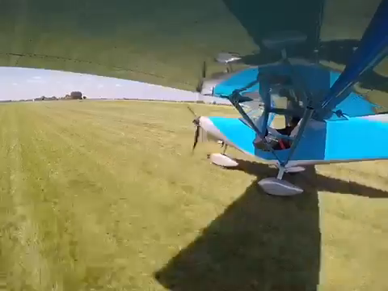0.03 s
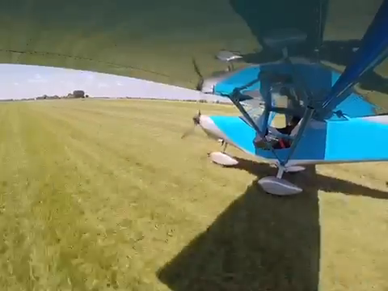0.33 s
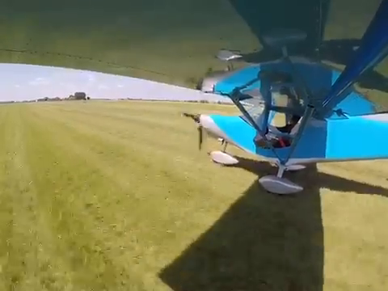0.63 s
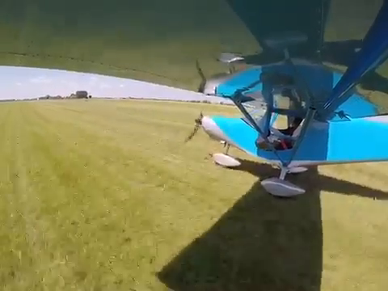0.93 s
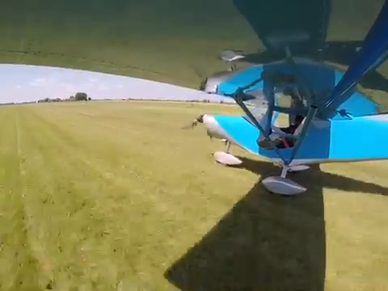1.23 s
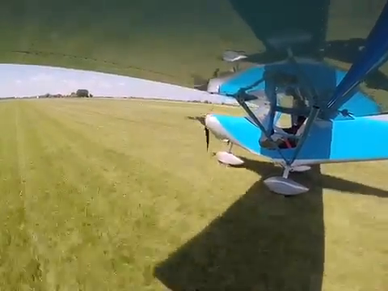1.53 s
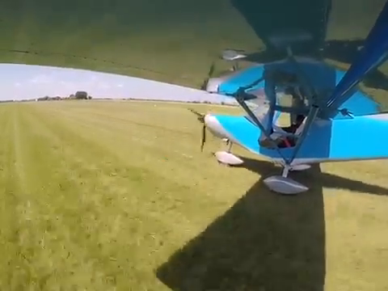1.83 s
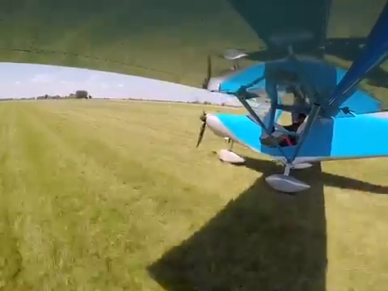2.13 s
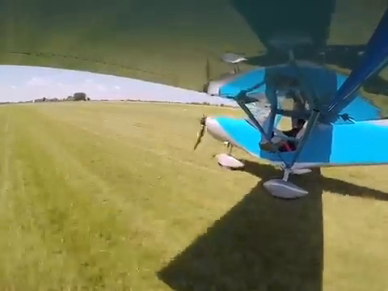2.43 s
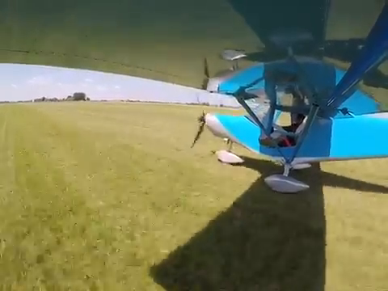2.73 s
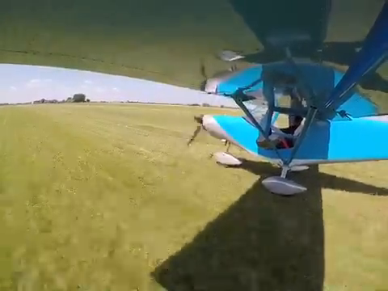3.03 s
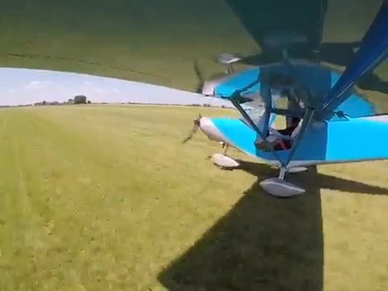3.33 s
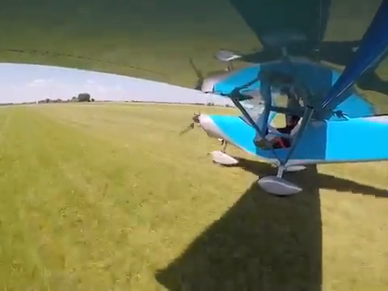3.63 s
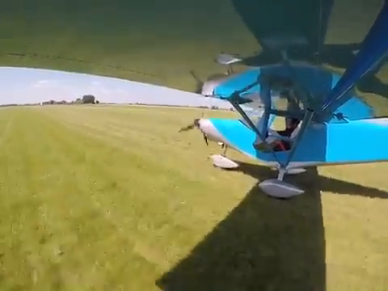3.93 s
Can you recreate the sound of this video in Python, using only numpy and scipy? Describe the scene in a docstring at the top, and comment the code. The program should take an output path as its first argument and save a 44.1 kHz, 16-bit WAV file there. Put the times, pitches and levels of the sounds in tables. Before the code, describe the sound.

A small propeller plane taxis over bumpy grass, heard from under the wing. Its engine hums steadily beneath a deep booming of the wing and wind rumble. Loose fittings rattle and knock, mostly in the first half.

```python
"""A deep wing boom and chattering fittings: a light aircraft taxis over grass, heard from under the wing.
Bumpy ground shakes the wing, which booms, drones and drums; loose fittings rattle, knock and ring.
The four-cylinder engine idles fast and turns a geared propeller, with a hum and a pulsing rush.
Wind rumbles, tufts brush the wheel fairings, and a limiter holds down the loudest swells."""
import sys
import numpy as np
from scipy import signal
from scipy.fft import rfft, irfft
from scipy.io import wavfile
from scipy.ndimage import uniform_filter1d, minimum_filter1d, map_coordinates

SR = 44100
rng = np.random.default_rng(int(sys.argv[2]) if len(sys.argv) > 2 else 0)


def output_pcm(signal):
    """Save a mono or channel-first signal as 16-bit PCM at the path in sys.argv[1].

    Samples are clipped to [-1, 1] before scaling.
    """
    pcm = np.clip(np.atleast_2d(signal).T, -1, 1) * 32767
    wavfile.write(sys.argv[1], SR, np.round(pcm).astype(np.int16))


N = 176400
TIME_S = np.arange(N) / SR
BINS_HZ = np.maximum(np.arange(N // 2 + 1) * SR / N, 1)

# response of the fittings: freq_hz, gain_db
FITTING_SPECTRUM = [(150, -29.5), (400, -9), (540, -5), (680, -1.5), (810, 1), (920, 3), (1040, 0),
                    (1230, -6), (1600, -8), (2200, -14.5), (2600, -21.5), (4000, -28.5), (6000, -38.5),
                    (8500, -45.5), (11000, -72.5)]


def undb(db):
    """Decibels to gain."""
    return 10 ** (np.asarray(db) / 20)


def unit(x):
    """Scale to rms 1."""
    return x / np.sqrt(np.mean(x ** 2))


def curve(rows):
    """Join (time_s, value) rows by straight lines."""
    return np.interp(TIME_S, *np.array(rows).T)


def drift(rate_hz):
    """Smooth random drift, rms 1."""
    knots = rng.standard_normal(2048)
    return unit(map_coordinates(knots, [TIME_S * rate_hz], order=3, mode="wrap"))


def flutter_noise(depth_db, rate_hz):
    """White noise with a wavering level."""
    return rng.standard_normal(N) * undb(depth_db * drift(rate_hz))


def colour(x, spectrum):
    """Minimum-phase filter through (freq_hz, gain_db) points; output rms 1."""
    hz, db = np.array(spectrum).T
    gain = undb(np.interp(np.log(BINS_HZ), np.log(hz), db))
    cepstrum = irfft(np.log(gain), N)
    cepstrum[1:N // 2] *= 2
    cepstrum[N // 2 + 1:] = 0
    return unit(irfft(rfft(x) * np.exp(rfft(cepstrum)), N))


def resonance(hz, half_width_hz, evenness):
    """Randomly shaken mode, rms 1; evenness 0-1 steadies its swing."""
    gain = 1 / (1 + ((BINS_HZ ** 2 - hz ** 2) / (BINS_HZ * half_width_hz * 2)) ** 2)
    shaken = unit(irfft(rfft(rng.standard_normal(N)) * gain, N))
    swing = signal.hilbert(shaken)
    return unit(swing.real / (np.abs(swing) + 0.35) ** evenness)


def glides(rows, flutter_db, flutter_hz):
    """Shaken resonances that swell, glide and die away."""
    tones = np.zeros(N)
    for start_s, length_s, from_hz, to_hz, db in rows:
        progress = np.clip((TIME_S - start_s) / length_s, 0, 1)
        cycles = np.cumsum(from_hz + (to_hz - from_hz) * progress) / SR + rng.random()
        tones += undb(db) * np.sin(np.pi * progress) * np.sqrt(2) * np.sin(2 * np.pi * cycles)
    return tones * unit(undb(flutter_db * drift(flutter_hz)))


def hits(rows, spectrum, decay_s):
    """Short rough contacts ring a body; the output peaks at the highest row level."""
    contacts = np.zeros(N)
    for start_s, db in rows:
        envelope = np.exp(-np.abs(TIME_S - start_s) / decay_s) * (TIME_S >= start_s)
        burst = rng.standard_normal(N) * envelope
        contacts += undb(db) * burst / np.sqrt(np.sum(burst ** 2))
    ring = colour(contacts, spectrum)
    return ring / np.abs(ring).max() * undb(max(db for _, db in rows))


def grass():
    """Taller tufts swish along the wheel fairings."""
    # passing tufts: centre_s, half_length_s, level_db
    tufts = [(.69, 0.087, -45), (3.52, 0.038, -45.5)]
    # swish: freq_hz, gain_db
    spectrum = [(2500, -33), (4800, -2), (6200, -3), (7300, -13), (9000, -22), (11000, -39)]
    swell = sum(undb(db) * np.exp(-((TIME_S - at_s) / half_s) ** 2) for at_s, half_s, db in tufts)
    return swell * colour(flutter_noise(depth_db=2, rate_hz=200), spectrum)


def jingle(strikes_per_s=16, t60_s=0.029):
    """Small metal parts ping at random."""
    # one mode per part: pitch_hz, level_db
    parts = [(2250, -48), (3050, -53), (3600, -53.5), (4550, -56)]
    pings = np.zeros(N)
    for hz, db in parts:
        strikes = (rng.random(N) < strikes_per_s / SR) * rng.random(N)
        pole = np.exp(2j * np.pi * hz / SR - np.log(1000) / (t60_s * SR))
        pings += undb(db) * unit(signal.lfilter([1], [1, -pole], strikes + 1e-18).imag)
    return pings


def ticks():
    """Brief contacts give sharp ticks."""
    # contacts: start_s, level_db
    contacts = [(3.933, -14.5), (3.982, -22)]
    # struck body: freq_hz, gain_db
    spectrum = [(300, -1), (800, -5), (1400, 2), (2200, -5), (3500, -19.5), (5600, -9), (7200, -31),
                (9800, -39), (12000, -61)]
    return hits(contacts, spectrum, decay_s=0.0033)


def rush(turns, gain_db=5.5, flare_depth=0.5, decay_turns=0.2):
    """Clatter and rush of engine and propeller, flaring once per crank turn."""
    # rush: freq_hz, gain_db
    spectrum = [(200, -16.5), (450, -6.5), (780, -1), (1200, -4), (1700, -1.5), (2200, -5.5), (2600, -11.5),
                (3000, -10), (3250, -12.5), (3900, -9.5), (5000, -14), (6000, -18), (7200, -30),
                (8500, -36.5), (9500, -41.5), (11000, -62)]
    # envelope: time_s, relative_db
    levels = [(0.0, -33), (0.05, -38.5), (0.62, -35.5), (1.37, -36.5), (1.48, -40.5), (1.76, -39.5),
              (1.93, -36.5), (2.33, -38.5), (2.58, -36.5), (2.87, -39.5), (3.55, -35.5), (3.88, -39.5),
              (4.0, -38.5)]
    flare = 1 + flare_depth * np.exp(-(turns % 1) / decay_turns)
    grain = undb(0.69 * drift(rate_hz=300))
    hiss = colour(rng.standard_normal(N) * flare * grain, spectrum)
    return hiss * undb(curve(levels) + gain_db)


def engine(turns, exhaust_db=-40.5, scatter_db=8.5, propeller_db=-28, gear_ratio=2.43):
    """Two firings a turn sound the exhaust; shafts and gears hum, the propeller shakes the frame."""
    # shaft hum and gear whine: cycles_per_turn, level_db
    orders = [(1, -22.5), (2, -35), (3, -35), (4, -30.5), (22, -44), (45, -48)]
    # exhaust response: freq_hz, gain_db
    spectrum = [(40, -23), (70, -13.5), (140, 34.5), (220, -7), (350, -9), (700, -10), (1400, -24),
                (3000, -48.5)]
    firings = np.flatnonzero(np.diff(np.floor(2 * turns)))
    pulses = np.zeros(N)
    pulses[firings] = undb(scatter_db * rng.standard_normal(400)[:len(firings)])
    exhaust = undb(exhaust_db) * colour(pulses, spectrum)
    hum = np.zeros(N)
    for order, db in orders:
        phase_rad = 2 * np.pi * order * turns + 0.42 * drift(rate_hz=6.4)
        waver = undb(2.2 * drift(rate_hz=8))
        hum += undb(db) * unit(np.sin(phase_rad) * waver)
    propeller = undb(propeller_db) * unit(np.sin(2 * np.pi * turns / gear_ratio))
    return exhaust + hum + propeller


def wind(level_db=-20):
    """Gusty air rumbles on the microphone."""
    # rumble: freq_hz, gain_db
    spectrum = [(10, -10.5), (16, 2), (27, -12.5), (42, -9), (68, 4), (95, -1), (135, -2.5), (185, -5.5),
                (260, -15), (400, -23), (700, -34.5), (2000, -71)]
    return colour(flutter_noise(depth_db=1.5, rate_hz=14), spectrum) * undb(level_db)


def rings():
    """A loose fitting keeps ringing."""
    # ringing notes: start_s, length_s, from_hz, to_hz, level_db
    notes = [(.28, 0.11, 771, 847, -25.5), (.42, 0.11, 879, 790, -28), (.6, 0.172, 979, 916, -25),
             (1.06, 0.05, 960, 920, -31)]
    return glides(notes, flutter_db=6.5, flutter_hz=110)


def knocks():
    """Harder contacts knock the fittings."""
    # contacts: start_s, level_db
    contacts = [(.210, -11.5), (.463, -10.5), (.64, -10), (.723, -15), (.865, -10), (.897, -14),
                (1.224, -17), (1.436, -10.5), (1.444, -14.5), (3.5, -14), (3.747, -16)]
    return hits(contacts, FITTING_SPECTRUM, decay_s=0.0073)


def chatter(gain_db=-1.08, strikes_per_s=900, scatter_db=2.5, scrape_gain=0.16, scrape_s=0.005):
    """Loose fittings strike in dense, uneven bunches; each contact scrapes briefly."""
    # envelope: time_s, relative_db
    levels = [(0.0, -24.5), (0.11, -19), (0.13, -33), (0.17, -23), (0.51, -20.5), (0.98, -21.5),
              (1.06, -20.5), (1.19, -26.5), (1.27, -18.5), (1.32, -32.5), (1.35, -22), (1.37, -31),
              (1.43, -31), (1.44, -24), (1.61, -31.5), (1.95, -32.5), (1.97, -22), (2.07, -26.5),
              (3.74, -29.5), (3.79, -45), (4.0, -55)]
    struck = rng.random(N) < strikes_per_s / SR
    strikes = struck * undb(scatter_db * rng.standard_normal(N).clip(-2, 2))
    scrape_power = signal.lfilter([1], [1, -np.exp(-2 / (scrape_s * SR))], strikes ** 2)
    scrape = np.sqrt(scrape_power) * rng.standard_normal(N)
    contacts = strikes * rng.choice([-1, 1], N) + scrape_gain * scrape
    return colour(contacts, FITTING_SPECTRUM) * undb(curve(levels) + gain_db)


def wing_skin(gain_db=-1.5):
    """The wing skin drums with the bumps."""
    # envelope: time_s, relative_db
    levels = [(0.0, -17), (0.04, -34), (0.37, -33), (0.69, -23), (0.92, -31), (0.97, -24), (1.79, -34),
              (1.88, -27.5), (2.35, -31), (2.37, -24), (2.78, -35), (3.68, -34), (3.97, -52), (4.0, -27)]
    # skin response: freq_hz, gain_db
    spectrum = [(150, -19.5), (250, 3.5), (330, 1), (430, 0), (550, -7), (800, -14), (2000, -61)]
    drumming = colour(flutter_noise(depth_db=2, rate_hz=90), spectrum)
    return drumming * undb(curve(levels) + gain_db)


def wing_murmur(evenness=0.59):
    """Three higher wing modes murmur steadily under the shaking."""
    return (resonance(hz=107.7, half_width_hz=2.8, evenness=evenness) * undb(-29.5)
            + resonance(hz=166, half_width_hz=6.8, evenness=evenness) * undb(-31)
            + resonance(hz=201.8, half_width_hz=15, evenness=evenness) * undb(-33))


def drones():
    """The shaken airframe drones up on a note, then lets go."""
    # droning notes: start_s, length_s, from_hz, to_hz, level_db
    notes = [(.2, 0.046, 119.4, 124, -20.5), (.53, 0.29, 107, 106.5, -21.5), (.7, 0.12, 98, 133, -15),
             (.85, 0.12, 169, 164, -21), (1.01, .16, 162, 169.7, -19), (1.17, 0.3, 106, 108, -16.5),
             (1.6, .11, 108, 109, -17.5), (1.85, .14, 104, 107.5, -14), (1.94, 0.13, 163.7, 177, -20.5),
             (2.14, .11, 162.7, 121, -17.5), (2.32, 0.1, 138, 166, -16), (2.39, .18, 162.5, 168, -16),
             (2.53, .22, 103.7, 102.5, -21), (2.79, .12, 98.3, 123.6, -21.5), (3.01, .16, 140, 146.6, -20),
             (3.16, .13, 145.1, 174, -17.5), (3.32, 0.23, 214.4, 181.3, -23.5),
             (3.61, .11, 164.3, 131, -19.5)]
    return glides(notes, flutter_db=0.9, flutter_hz=37)


def wing_boom(turns, gain_db=1.5, chug_depth=0.45):
    """The rolling wheels shake the wing's lowest mode; it chugs once per two-turn engine cycle."""
    # envelope: time_s, relative_db
    levels = [(0.0, -14.5), (0.27, -15), (0.31, -20), (0.7, -16), (0.75, -22.5), (0.93, -11.5),
              (1.05, -22.5), (1.19, -16), (1.73, -18.5), (1.75, -14.5), (2.47, -19), (2.78, -14),
              (2.86, -25), (2.95, -18), (3.05, -21), (3.1, -18), (3.3, -26), (3.4, -14.5), (4.0, -13)]
    chug = unit(1 + chug_depth * np.cos(np.pi * turns))
    boom = resonance(hz=50.3, half_width_hz=6, evenness=0.65)
    return boom * chug * undb(curve(levels) + gain_db)


def scene():
    """Airframe, engine, wind and grass in mono."""
    # crankshaft speed: time_s, turns_per_s
    crank_speed = [(0, 40), (.9, 31.2), (2.0, 35.2), (2.6, 36.2), (3.4, 35.45), (4, 35.8)]
    turns = np.cumsum(curve(crank_speed)) / SR
    fittings = chatter() + rings() + knocks()
    wing = wing_boom(turns) + wing_murmur() + wing_skin() + drones()
    airframe = wing + fittings + jingle() + ticks()
    return (airframe + engine(turns) + rush(turns) + wind() + grass())[None]


def record(dry):
    """A limiter holds down swells and catches peaks; a low-pass cuts the top."""
    threshold_db, ratio, window_s = -9.5, 4.2, 0.023
    makeup_db, ceiling_db, cutoff_hz = 1, -1.2, 10500
    window = int(window_s * SR)
    rms = np.sqrt(uniform_filter1d(dry ** 2, window).clip(1e-12))
    swell_gain = np.minimum(1, undb(threshold_db) / rms) ** (1 - 1 / ratio)
    held = dry * uniform_filter1d(swell_gain, window) * undb(makeup_db)
    peak_gain = 1 / np.maximum(1, np.abs(held) / undb(ceiling_db))
    limited = held * uniform_filter1d(minimum_filter1d(peak_gain, size=301), size=301)
    lowpass = signal.ellip(8, .2, 70, cutoff_hz, fs=SR, output="sos")
    return signal.sosfilt(lowpass, limited)


dry = scene()
out = record(dry)
output_pcm(out)
```